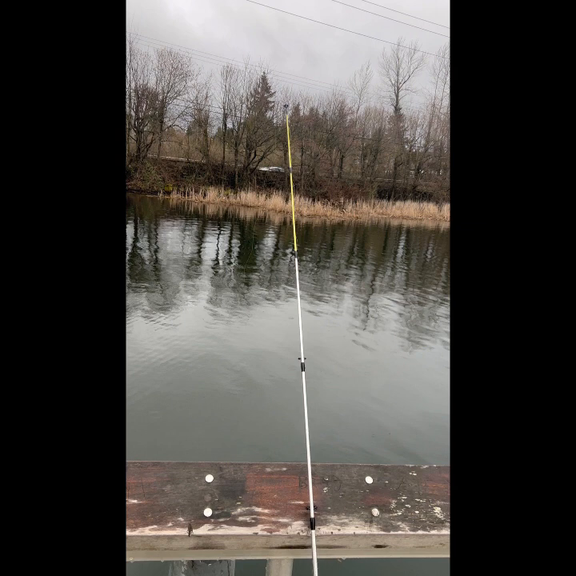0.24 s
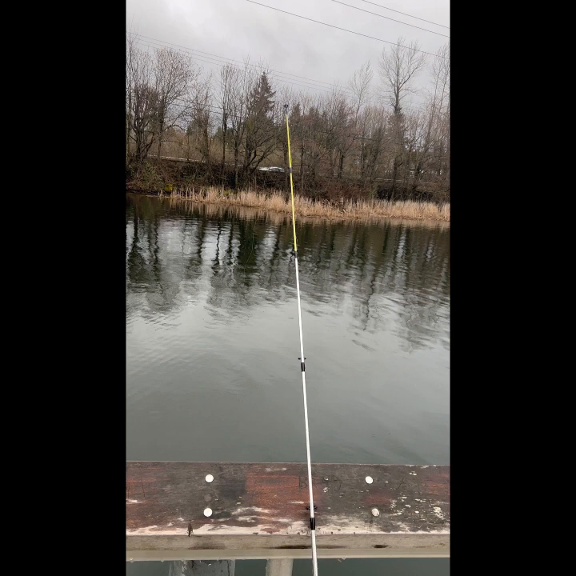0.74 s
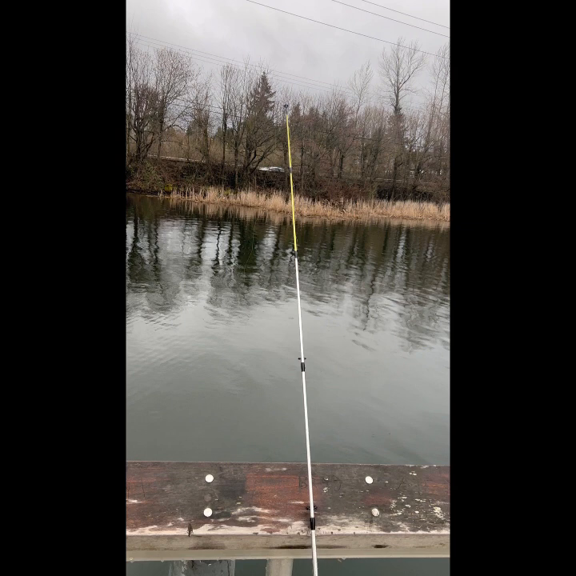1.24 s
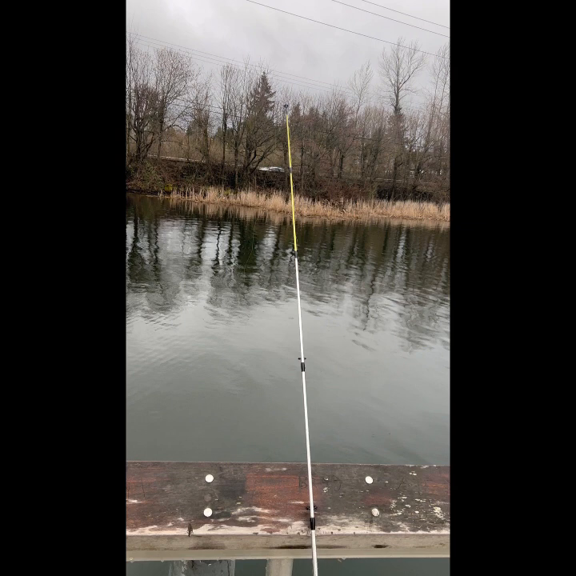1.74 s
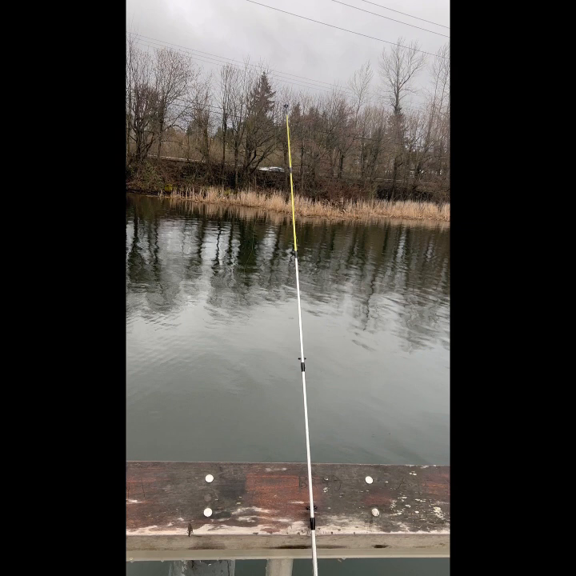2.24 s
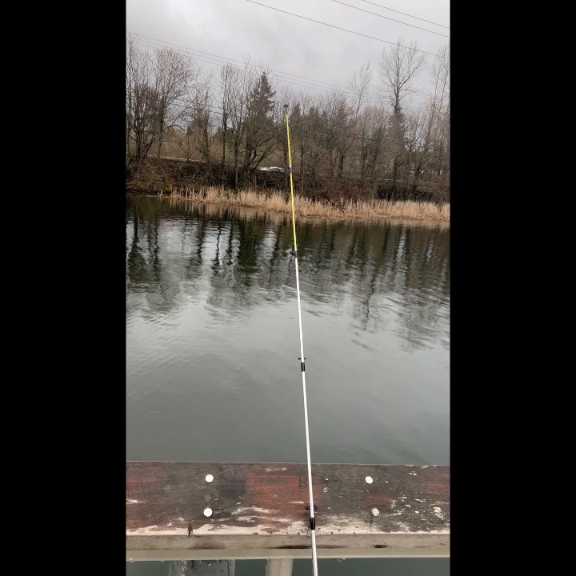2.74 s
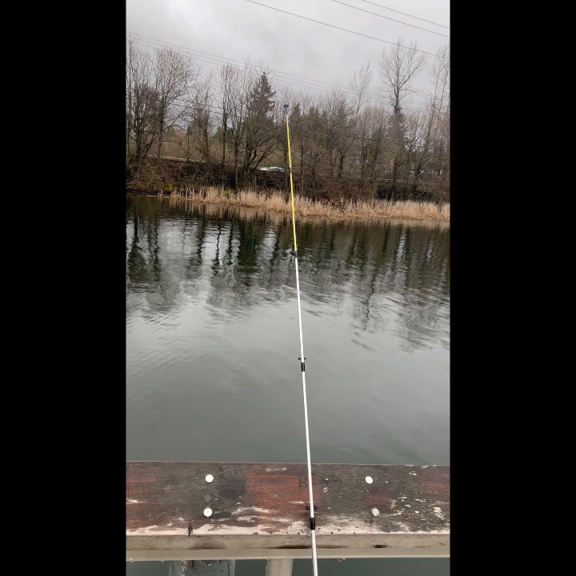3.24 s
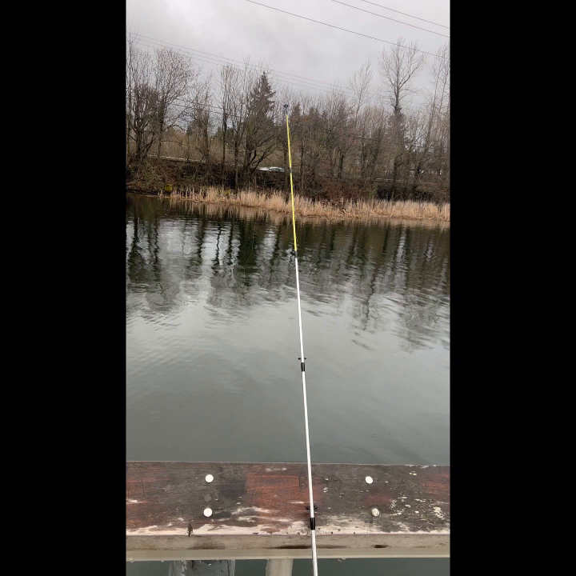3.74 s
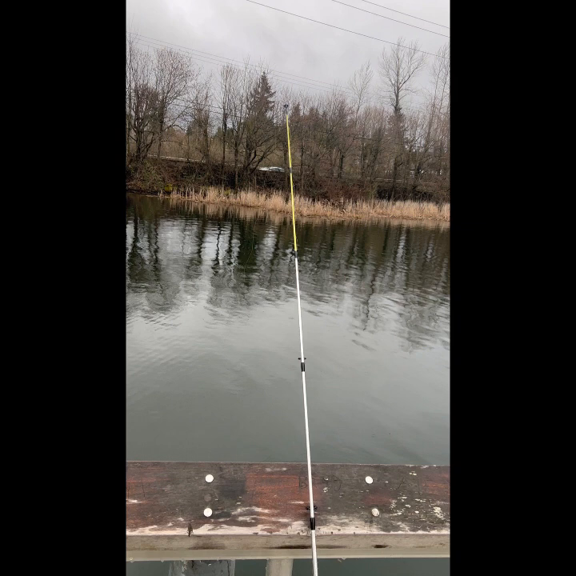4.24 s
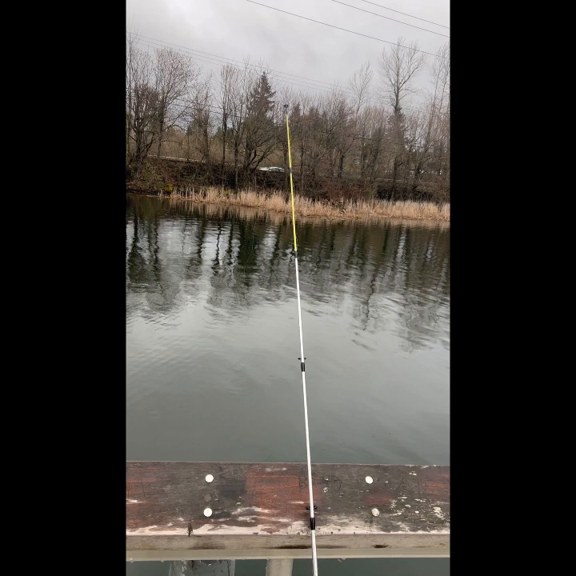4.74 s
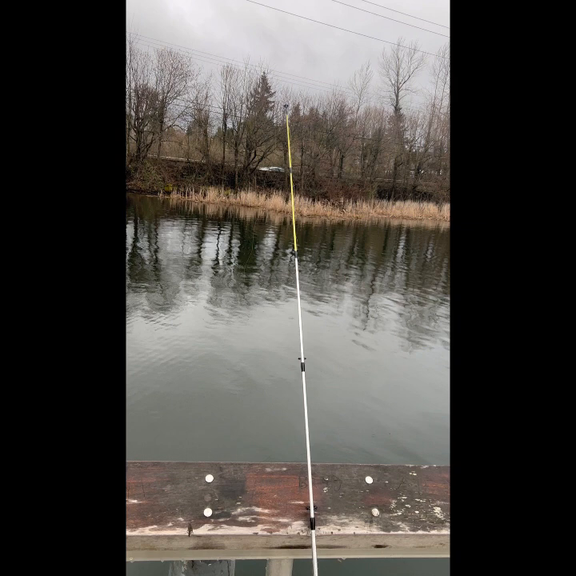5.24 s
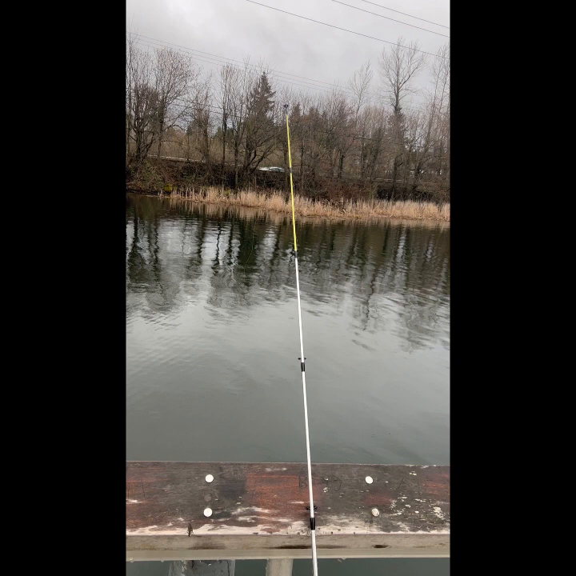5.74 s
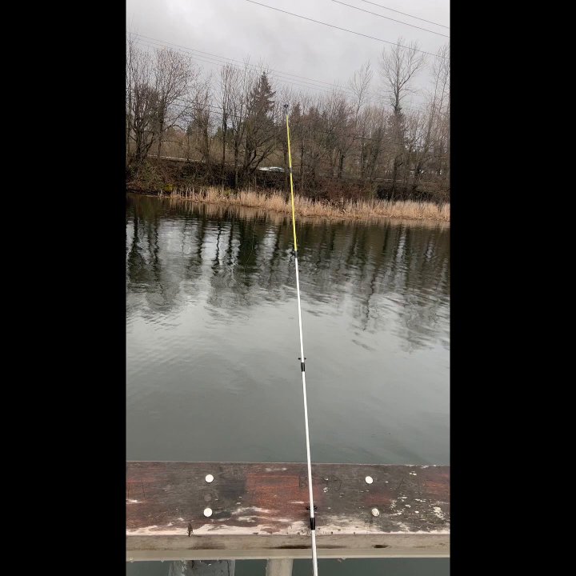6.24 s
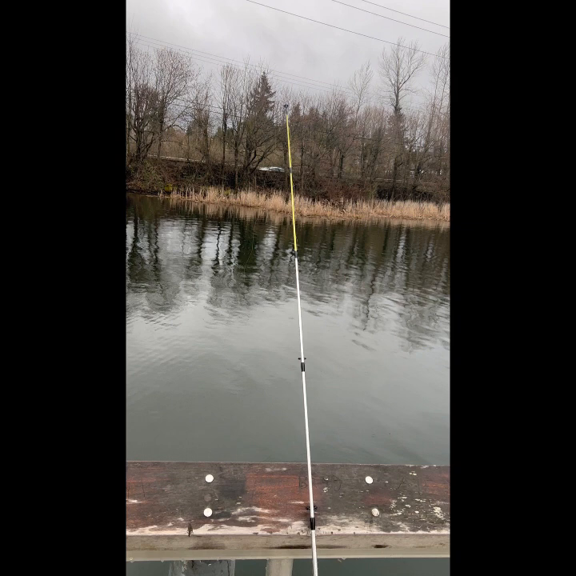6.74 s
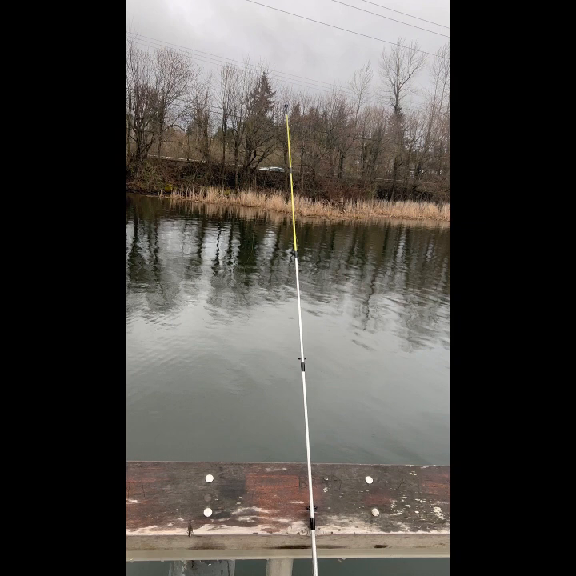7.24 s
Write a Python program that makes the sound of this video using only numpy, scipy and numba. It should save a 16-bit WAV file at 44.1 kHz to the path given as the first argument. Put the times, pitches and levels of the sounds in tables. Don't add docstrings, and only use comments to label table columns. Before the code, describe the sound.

Constant distant traffic, bassy with a soft hiss, gently swelling as vehicles pass across the water. Over it a deep engine hum dips, grows strongest at about three seconds, then disappears, leaving only road noise. Early on a second engine shifts gear and a strap squeaks, rising and roughening. Faint high bird peeps sit far away. At arm's length, cloth slides, scuffs and snaps, with the strongest rustle near the end, heard through a slightly muffled microphone.

```python
import sys
import numpy as np
from scipy import signal
from scipy.fft import rfft, irfft
from scipy.io import wavfile
from scipy.ndimage import uniform_filter1d
from numba import njit

SR = 44100
rng = np.random.default_rng(int(sys.argv[2]) if len(sys.argv) > 2 else 0)


def ratio_of_db(decibels):
    return 10 ** (np.asarray(decibels, float) / 20)


def generate_wav(sig):
    pcm = np.round(np.clip(np.atleast_2d(sig).T, -1, 1) * 32767).astype(np.int16)
    wavfile.write(sys.argv[1], SR, pcm)


N = 329411
T = np.arange(N) / SR

# [f/Hz, density/dB per Hz]
ROAD_COLOUR = [(20, -35.5), (30, -21.5), (48, -7.5), (75, 1.5), (110, -1), (200, -5.5), (380, -9),
               (640, -11.5), (890, -8.5), (1150, -14), (1700, -21), (2100, -28.5), (3200, -36.5),
               (5000, -48), (7200, -61)]
ROAD_DB = -28
# [nearest t/s, half length/s, swell/dB, most lifted f/Hz]
PASSES = [(0.099, 1.0, 3.5, 2104), (0.449, .3, 2, 700), (1.4, 0.9, 2, 258), (2.402, 0.63, 3, 603),
          (3.302, 0.43, 1, 260), (3.9, .6, 2.5, 750), (4.602, 0.57, 2, 300), (5.201, .8, 3, 700),
          (5.9, 1.7, 3, 2100), (5.599, .25, 2, 130), (6.501, .4, 0.5, 90.18), (7.5, .6, 2, 700),
          (7.402, 0.42, 1, 80)]
PASS_OCTAVES, HISS_HZ = .9, 2000

# [t/s, length/s, f/Hz, level/dB]
PEEPS = [(.83, .03, 6200, -74), (1.335, .025, 5560, -72), (1.555, .04, 5430, -69), (1.615, .015, 5400, -70),
         (1.65, .02, 5400, -73), (1.75, .018, 5420, -71), (1.775, .015, 3300, -63),
         (1.785, .025, 5460, -70), (1.80, .025, 3800, -66), (1.81, .025, 3350, -62), (2.3, .03, 7050, -76),
         (2.35, .03, 6950, -76), (3.41, .02, 6400, -77), (7.3, .02, 7100, -76)]

# [t/s, peak level/dB, centre f/Hz]
TICKS = [(.792, -41, 3600), (.974, -40, 4600), (0.981, -36, 4600), (1.437, -37.5, 3060), (1.481, -46, 6100),
         (1.960, -54, 4500), (2.108, -39, 4400), (2.321, -55, 6900), (2.62, -55, 6800), (4.053, -55, 4996),
         (4.135, -36.5, 3410), (4.191, -49, 3500), (4.241, -42, 4500), (4.251, -52, 5320),
         (4.265, -52, 5100), (4.415, -43, 5000), (4.471, -46, 6310), (4.489, -44, 6600), (4.739, -41, 4400),
         (4.866, -47, 3900), (4.901, -45, 3700), (5.021, -40, 2700), (6.381, -45, 5490), (6.421, -37, 3800),
         (6.47, -45, 3980), (6.557, -49, 4500), (6.589, -44, 5070), (6.691, -50, 5400)]
TICK_WIDTH_HZ = 2100

# [t/s, f/Hz, level/dB, roughness 0-1]
STRAP_CREAK = [
    (1.75, 342, -44, .1),
    (1.82, 348, -34, .2),
    (1.87, 430, -40, .9),
    (1.94, 580, -37.5, .9),
    (2.02, 720, -42, .95),
]

# [peak t/s, rise/s, fall/s, level/dB]
SLIDES = [
    (.1, .3, .4, -63),
    (.8, .35, 0.29, -57),
    (1.5, .3, .4, -65),
    (2.4, .2, .4, -71),
    (4.1, 0.29, .2, -60),
    (4.78, 0.29, 0.27, -60.5),
    (5.3, 0.5, 0.43, -63.5),
    (6.17, .35, 0.17, -57),
    (6.41, .1, .24, -49.5),
    (7.0, 0.54, 0.57, -61.5),
]
REST_DB, BRIGHT_AT_REST, BRIGHT_PER_DB = -74, 0.74, -.014

# [t/s, rise/s, drag level/dB, first snap level/dB]
SCUFFS = [
    [(.981, .001, -50.5, -36), (1.171, .013, -44.5, -32), (1.192, .003, -49.5, -46)],
    [(1.365, .001, -39.5, -33), (1.383, 0.0019, -55, -50)],
    [(3.708, 0.021, -41.5, -45), (3.720, .001, -51, -36), (3.742, 0.0011, -51, -40)],
    [(3.948, .001, -45, -46), (3.955, .003, -41.5, -43), (3.968, 0.0011, -39.5, -26),
     (3.977, 0.0011, -51, -36)],
]
# [f/Hz, width/Hz, level/dB]
CLOTH = [
    [(1300, 700, 1), (2000, 230, 11.5), (2840, 440, 7.5), (3800, 300, 5.5), (4500, 600, -3),
     (6040, 1400, -8)],
    [(1200, 630, 4), (1970, 470, 10.5), (2940, 810, 5.5), (4500, 820, 1.5), (5600, 580, -2),
     (6600, 510, -0.5)],
    [(900, 530, 4), (1702, 370, 8), (2500, 650, 3.5), (3800, 400, 5), (5100, 350, 2), (6900, 560, -8.5)],
    [(895, 600, 8.5), (2400, 420, 8), (3520, 300, 4.5), (5000, 600, -1), (5796, 500, -1), (6800, 600, -8)],
]
HOLD_S, FADE_T60_S, LONGER_PER_DB = 0.0059, 0.06, 0.0758

SHIFT_S, SHIFT_LENGTH_S, HIGH_HZ, LOW_HZ = 1.07, 0.1398, 348.4, 238.6
PULL_DB, SHIFT_DB, SURGE_S, GONE_S = -44.5, -31.5, .15, 1.45

# [t/s, firing f/Hz, firing level/dB, exhaust boom at 5/4 of f against firing level/dB]
HEAVY_ENGINE = [(0, 120.9, -25.5, -5), (.2, 122.1, -27, -5.5), (.65, 121.4, -34.5, 1),
                (.86, 120.9, -28.5, -5.5), (1.12, 115.8, -38.5, -0.5), (1.32, 118.2, -32, -3.5),
                (1.8, 121.1, -31.5, -7), (2.16, 124.4, -28, -6.5), (2.45, 126.4, -24, -9),
                (2.68, 127.9, -22.5, -4), (2.88, 128.6, -25.5, -3.5), (3.04, 128.4, -19, -9.5),
                (3.26, 125.7, -25, -4.5), (3.66, 127, -22.5, -5.5), (4.15, 126.3, -26, -14.5),
                (4.52, 125, -27, -9), (4.78, 120.5, -33, -9), (5.0, 123.5, -32.5, -12)]
# [eighths of firing f, level/dB at CRUISE_HZ, gain/dB per Hz of firing f]
CYLINDERS = [
    (11, -50.5, 1.1),
    (13, -44, -0.7),
    (16, -51, -0.15),
    (18, -45, .5),
    (23, -48, 0),
    (20, -50.5, 0.84),
]
CRUISE_HZ, WAVER_DB = 121.1, 3.5


def curves(table):
    s, *columns = np.transpose(table)
    return [np.interp(T, s, c) for c in columns]


def level(x, db):
    return x * ratio_of_db(db) / np.sqrt(np.mean(x ** 2))


@njit
def svf(x, hz, width):
    y, band, low = np.empty(len(x)), 0., 0.
    g, k = np.tan(np.pi * hz / SR), width / hz
    for i in range(len(x)):
        v = (band + g * (x[i] - low)) / (1 + g * (g + k))
        band, low, y[i] = 2 * v - band, low + 2 * g * v, k * v
    return y


def walk(rate):
    hold = int(SR / rate)
    steps = np.repeat(rng.standard_normal(N // hold + 1), hold)
    return 1.16 * uniform_filter1d(uniform_filter1d(steps, hold), hold)[:N]


def window(start, stop, fade):
    return np.clip(np.minimum(T - start, stop - T) / fade + 1, 0, 1)


def bump(peak, rise, fall):
    return np.exp(-((T - peak) / np.where(T < peak, rise, fall)) ** 2)


def tone(hz):
    return np.sqrt(2) * np.sin(2 * np.pi * (np.cumsum(hz) / SR + rng.random()))


def grit(rough_db):
    return level(rng.standard_normal(N) * ratio_of_db(rough_db * walk(700)), 0)


def road():
    colour_hz, colour_db = np.transpose(ROAD_COLOUR)
    f = np.fft.rfftfreq(N, 1 / SR) + 1
    shaped = rfft(rng.standard_normal(N)) * ratio_of_db(np.interp(np.log(f), np.log(colour_hz), colour_db))
    swells = np.array([bump(s, half, half) for s, half, _, _ in PASSES])
    _, _, pass_db, pass_hz = np.transpose(PASSES)
    out = 0
    for third in range(27):
        hz = 20 * 2 ** (third / 3)
        share = np.clip(1 - abs(3 * np.log2(f / hz)), 0, 1)
        octaves_off = np.log2(min(hz, HISS_HZ) / pass_hz)
        swell_db = (pass_db * np.exp(-(octaves_off / PASS_OCTAVES) ** 2)) @ swells
        flicker_db = 0.72 * walk(3.3)
        out = out + ratio_of_db(swell_db - swell_db.mean() + flicker_db) * irfft(shaped * share, N)
    return level(out, ROAD_DB)


def bird():
    out = 0
    for s, length, hz, db in PEEPS:
        out = out + ratio_of_db(db + 2.3 * walk(90)) * window(s, s + length, .008) * tone(hz + 70 * walk(120))
    return out


def ticks():
    out, t = np.zeros(N + 1000), T[:1000]
    for start, db, hz in TICKS:
        burst = rng.standard_normal(len(t)) * ratio_of_db(-60 * t / .011)
        snap = svf(burst, float(hz), float(TICK_WIDTH_HZ))
        snap = svf(snap, float(hz), float(TICK_WIDTH_HZ))
        out[int(start * SR):][:len(t)] += snap * ratio_of_db(db) / abs(snap).max()
    return out[:N]


def creak():
    hz, db, rough = curves(STRAP_CREAK)
    slips = tone(hz * (1 + .1 * rough ** 2 * walk(90))) * ratio_of_db((1 + 4 * rough) * walk(35))
    return ratio_of_db(db) * window(STRAP_CREAK[0][0], STRAP_CREAK[-1][0], .02) * slips


def rustle():
    slide = ratio_of_db(REST_DB) + sum(ratio_of_db(db) * bump(s, rise, fall) for s, rise, fall, db in SLIDES)
    grains = grit(rough_db=2.6) * ratio_of_db(1.3 * walk(60))
    dull = level(svf(svf(grains, 2400.0, 2600.0), 3000., 2800.0), 0)
    bright = level(svf(svf(grains, 4800.0, 3500.), 3900.0, 4200.0), 0)
    above_rest_db = 20 * np.log10(slide / ratio_of_db(REST_DB))
    share = np.clip(BRIGHT_AT_REST + BRIGHT_PER_DB * above_rest_db, 0, 1)
    return ((1 - share) * dull + share * bright) * slide


def scuffs():
    grains, out = grit(rough_db=1.8), np.zeros(N)
    for moves, patch in zip(SCUFFS, CLOTH):
        for start, rise, db, snap_db in moves:
            i = slice(int(start * SR), int((start + .2) * SR))
            t = T[i] - start
            t60 = FADE_T60_S * np.exp(LONGER_PER_DB * (db + 46))
            fade = ratio_of_db(-60 * np.clip(t - rise - HOLD_S, 0, 1) / t60)
            drag = ratio_of_db(db + 11) * grains[i] * np.clip(t / rise, 0, 1) ** 2 * fade
            drag += ratio_of_db(snap_db + 11) * np.exp(-((t - rise) / .00008) ** 2)
            for k, (hz, width, ring_db) in enumerate(patch):
                out[i] += (-1) ** k * ratio_of_db(ring_db) * svf(drag, float(hz), float(width))
    return out


def gear_change():
    done = np.clip((T - SHIFT_S) / SHIFT_LENGTH_S, 0, 1)
    pull = ratio_of_db(PULL_DB) * (T < SHIFT_S)
    surge = ratio_of_db(SHIFT_DB) * bump(SHIFT_S + SHIFT_LENGTH_S / 2, SURGE_S, .4)
    hz = (HIGH_HZ + (LOW_HZ - HIGH_HZ) * done) * (1 + 0.0034 * walk(40))
    return (pull + surge) * ratio_of_db(1.2 * walk(12)) * window(-1, GONE_S, 0.23) * tone(hz)


def engine():
    hz, firing_db, boom_db = curves(HEAVY_ENGINE)
    drift = 1 + .0015 * walk(12)
    out = ratio_of_db(firing_db + 1.2 * walk(7.96)) * tone(hz * drift)
    out += ratio_of_db(firing_db + boom_db + 2.4 * walk(8)) * tone(hz * drift * 5 / 4)
    for eighths, db, db_per_hz in CYLINDERS:
        gain = ratio_of_db(db + db_per_hz * (hz - CRUISE_HZ) + WAVER_DB * walk(5))
        uneven = tone(hz * (1 + .006 * walk(25)) * round(eighths) / 8)
        out += gain * window(-1, 4.14, 0.56) * uneven
    return out * window(-1, HEAVY_ENGINE[-1][0], .2)


def scene():
    far = road() + bird() + gear_change() + engine()
    near = ticks() + creak() + rustle() + scuffs()
    return (far + near)[None]


def top_cut(x):
    return signal.sosfilt(signal.butter(12, 7490, fs=SR, output="sos"), x)


def record(dry):
    droop = signal.sosfilt(signal.butter(6, 7000, fs=SR, output="sos"), dry)
    cut = signal.sosfilt(signal.ellip(12, .2, 90, 7165, fs=SR, output="sos"), droop)
    return top_cut(cut)


dry = scene()
out = record(dry)
generate_wav(out)
```